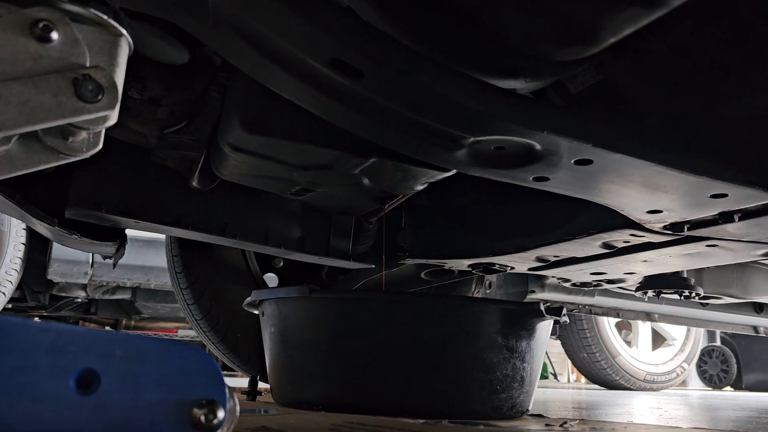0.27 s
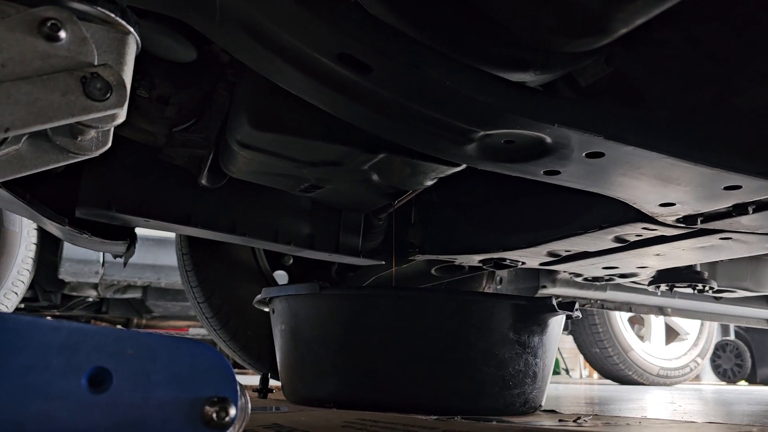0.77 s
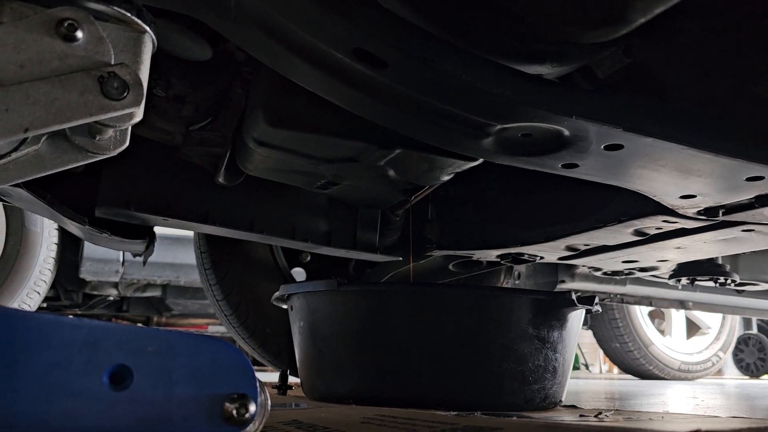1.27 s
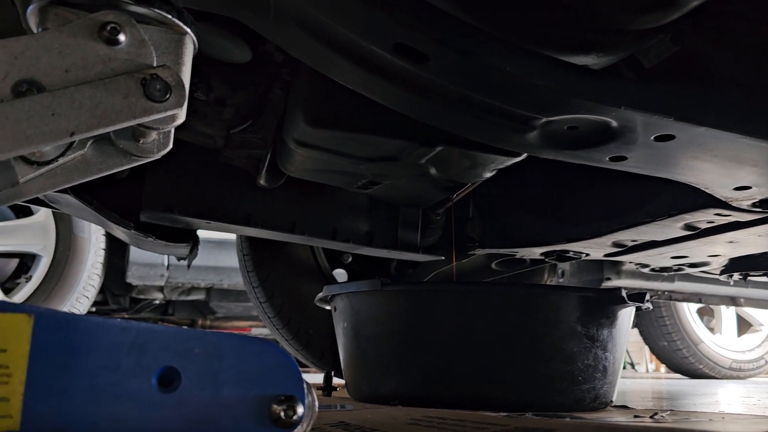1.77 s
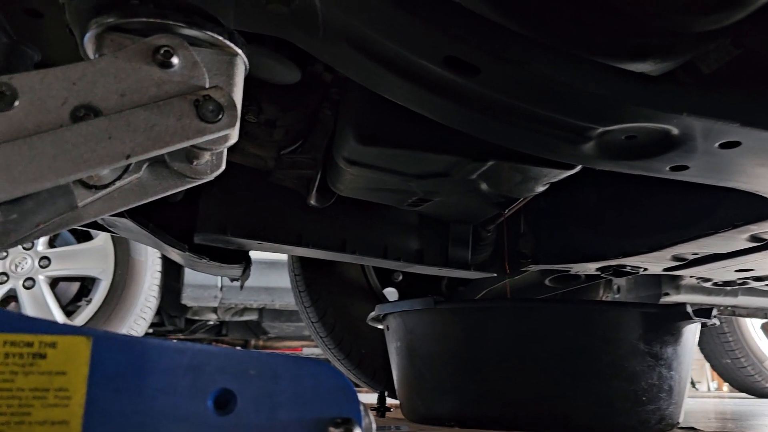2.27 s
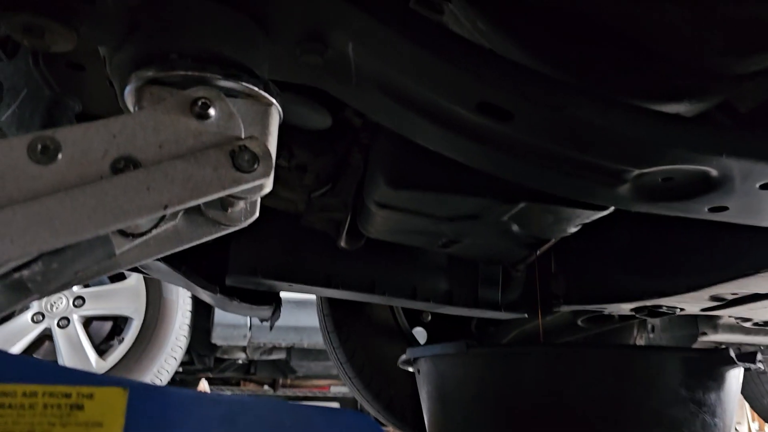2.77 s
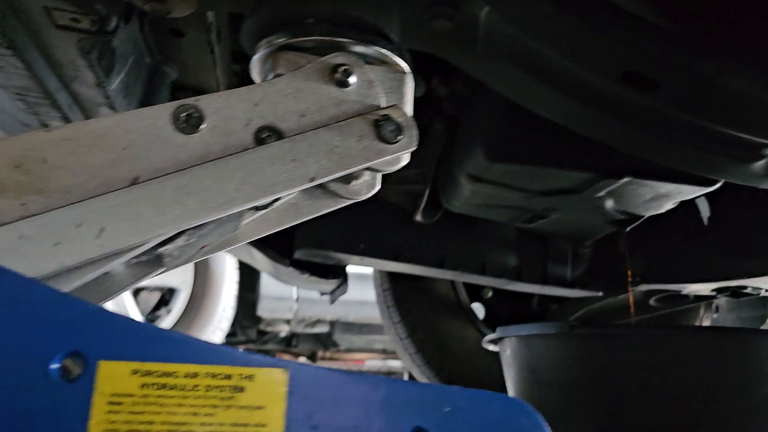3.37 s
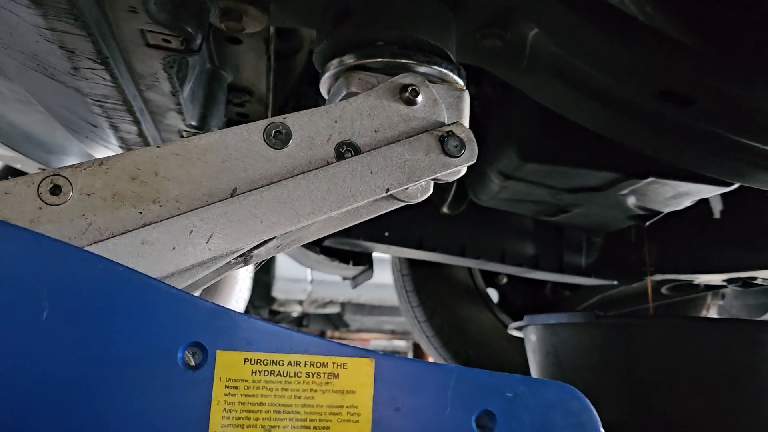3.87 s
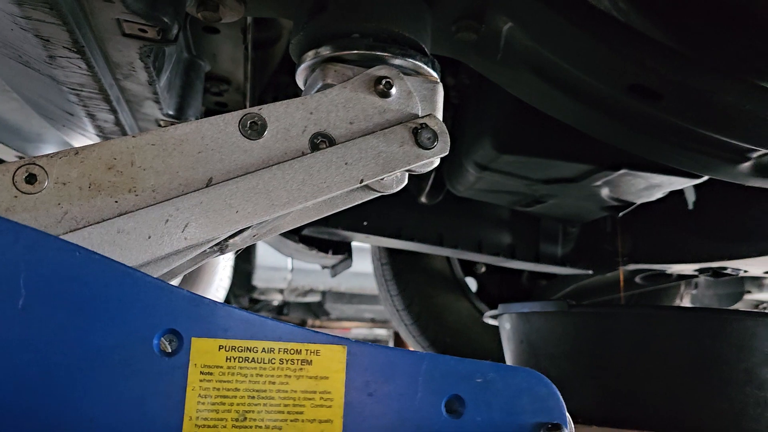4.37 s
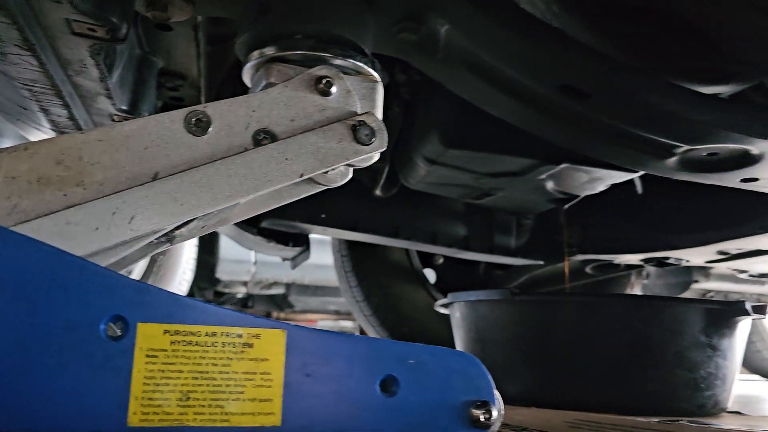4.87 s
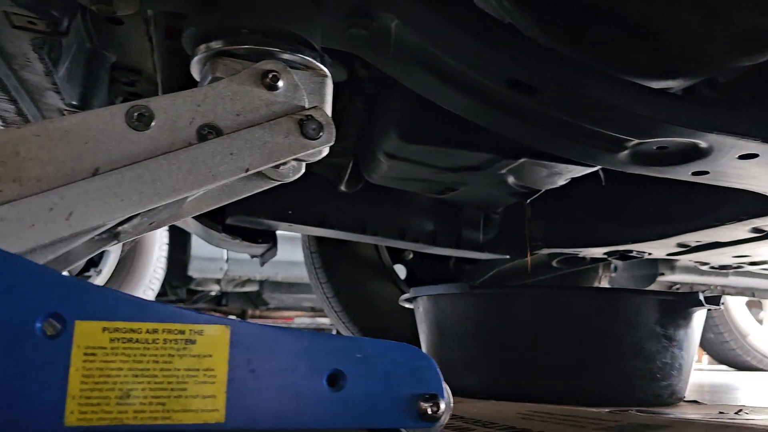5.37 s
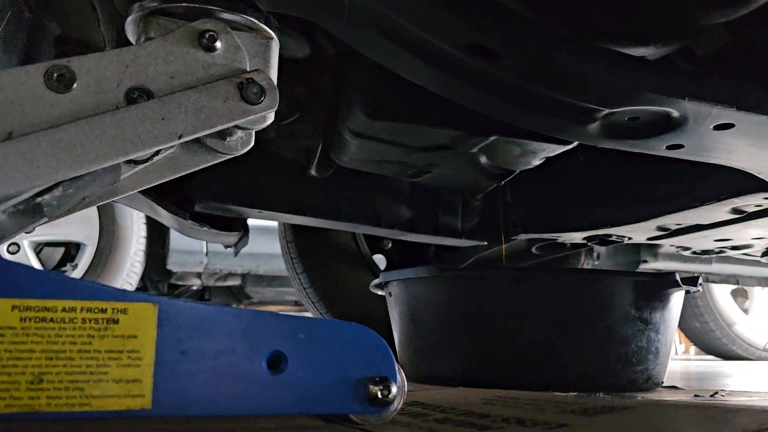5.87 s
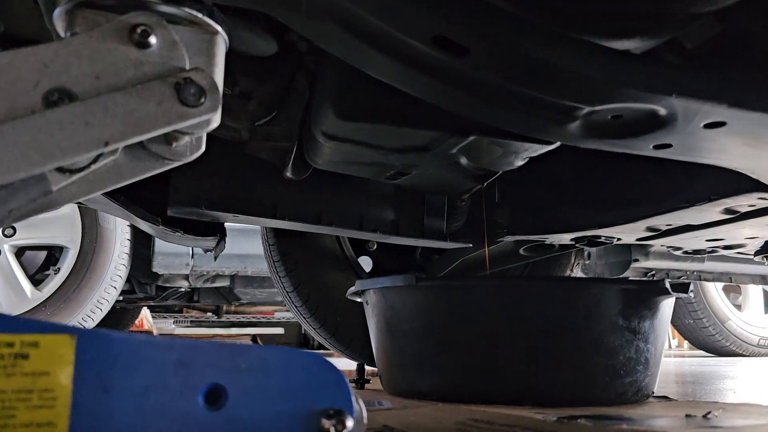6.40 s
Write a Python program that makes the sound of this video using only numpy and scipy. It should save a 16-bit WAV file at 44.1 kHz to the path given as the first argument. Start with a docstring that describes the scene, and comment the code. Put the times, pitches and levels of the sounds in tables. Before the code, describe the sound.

A thin stream of used oil falls into a plastic pan under a raised car, making a faint, high patter with small irregular drips throughout. A low garage rumble and soft air hiss lie beneath it. A distant motor drones briefly twice in the first half. Then clothing brushes softly and the grip creaks a little as the microphone is moved around low beside the car.

```python
"""Soft, wet ticks and patter: a thin stream of used oil falls into a plastic pan under a jacked-up car.
Splats and tiny bubbles excite the resonances of the hollow between pan and underbody.
Behind them lie the garage's low rumble, the hiss of moving air and a faint whine of mains harmonics.
A distant motor drones twice; clothing brushes and the grip creaks as the microphone is carried around."""
import sys
import numpy as np
from scipy import signal
from scipy.fft import rfft, irfft, next_fast_len
from scipy.io import wavfile
from scipy.ndimage import uniform_filter1d

SR = 44100
rng = np.random.default_rng(int(sys.argv[2]) if len(sys.argv) > 2 else 0)


def wrap_up_sound(samples):
    """Save the sound to the file named by the first command line argument, as 16-bit audio."""
    columns = np.atleast_2d(samples).T
    # keep every value between -1 and 1, then stretch to whole-number steps
    tamed = np.clip(columns, -1, 1)
    steps = np.round(tamed * 32767).astype(np.int16)
    wavfile.write(sys.argv[1], SR, steps)


N = 292705
T = np.arange(N) / SR
MAINS_HZ, TOP_HZ = 60.014, 15750

# Levels in the tables are relative; each source applies its own gain.
# spectrum of the garage rumble: f/Hz, level/dB
RUMBLE_SPECTRUM = [(20, -23), (38, -5), (56, 0.5), (80, 5.5), (110, -3), (138, -2.5), (175, -12),
                   (240, -13), (290, -19), (340, -33.5), (390, -24.5), (470, -46)]
# envelope of the deep rumble: t/s, level/dB
DEEP_ENVELOPE = [(0.1, -47), (.5, -50), (1.8, -49.5), (2.5, -51.5), (3.9, -52), (5.8, -52), (6.6, -48.5)]
# envelope of the upper rumble: t/s, level/dB
UPPER_ENVELOPE = [(0, -61.5), (2.2, -58.5), (4.1, -63.5), (4.7, -60), (5.7, -65), (6.6, -62)]
# spectrum of moving air: f/Hz, left level/dB, right level/dB
AIR_SPECTRUM = [(99, 4, 0), (251, -5.5, -3.5), (426, -2.5, -7.5), (601, -2, -7), (709, -10, -13.5),
                (1080, -12.5, -14), (1250, -6.5, -16), (1924, -5, -17), (2390, -17.5, -27),
                (3300, -17, -24.5), (6850, -23.5, -24.5), (9200, -54, -31.5)]
# envelope of moving air: t/s, level/dB
AIR_ENVELOPE = [(0.0, -70), (0.51, -71), (1.43, -70.5), (1.91, -71.5), (2.17, -67), (2.77, -71),
                (3.27, -68), (4.23, -72), (6.6, -71.5)]
# spectrum of the electric whine: f/Hz, left level/dB, right level/dB
WHINE_SPECTRUM = [(11050, -9, -9), (11650, -5, -6), (12100, -8, -8), (13200, -12, -9), (13800, -10, -3),
                  (14500, -9, 0), (15100, -10, -2), (15650, -11, -6)]
# envelope of the narrow background hum: t/s, level/dB
HUM_ENVELOPE = [(0, -76), (1, -54.5), (1.5, -66), (3.7, -64), (4.2, -62), (6.6, -54.5)]
# brief hums that rise out of the rumble: t/s, duration/s, f/Hz, level/dB
BRIEF_HUMS = [(1.748, 0.27, 170, -57), (2.17, 0.25, 587, -69), (1.4, 0.51, 670, -72.5),
              (2.864, 1, 243.6, -60)]
# pulls of the distant motor: t/s, duration/s, starting f/Hz, glide/(Hz/s), level/dB
MOTOR_PULLS = [(1.3, 0.655, 139, -2, -51), (2.05, .83, 133, 29, -48.3)]
# strokes of clothing: t/s, duration/s, level/dB, centre f/Hz, bandwidth/Hz, grain depth/dB
CLOTH_STROKES = [(2.9, 0.35, -66, 5300, 5960, 2.5), (3.023, 0.71, -65, 4780, 7500, 1.7),
                 (3.403, 0.16, -63.5, 450, 201, 0), (3.874, 0.091, -60, 1870, 200, 3),
                 (4.163, 0.07, -62.5, 2560, 1400, 2), (6.034, 0.27, -69.5, 4350, 4650, 0)]
# slips of the grip: t/s, peak level/dB
GRIP_SLIPS = [(1.469, -55), (4.335, -54), (4.36, -52), (4.404, -51), (4.424, -54), (4.449, -54.5)]
# modes of the hollow between pan and underbody: f/Hz, bandwidth/Hz, level/dB
HOLLOW_MODES = [(2978, 147, 4.5), (3546, 236, 1.5), (4230, 200, 0.5), (4590, 170, 0), (5330, 450, 3.5),
                (6400, 460, -2.5), (7370, 260, 1), (7480, 170, -7), (9370, 230, -1.5)]
# envelope of the stream, which swells, then thins as the sump empties: t/s, level/dB
STREAM_ENVELOPE = [(0, -75.5), (1.3, -75.5), (2.8, -72), (4.1, -71.5), (5.8, -73), (6.6, -78)]
# flurries in which the stream breaks into fine splatter: t/s, duration/s, level/dB
FLURRIES = [(0.136, 0.32, -71), (0.646, 0.1, -71), (0.847, 0.083, -65), (1.08, 0.2, -68),
            (1.467, 0.11, -64.5), (2.02, 0.28, -71.5), (5.01, 0.25, -72), (5.592, 0.22, -74)]
# drops that stand out of the trickle: t/s, level/dB, ring f/Hz, treble relative to that level/dB
DROPS = [(0.027, -67.5, 3160, -16), (0.143, -71, 4180, -13), (0.2055, -71.5, 5350, -3),
         (0.2705, -73.5, 3020, -5), (0.3703, -75.5, 3460, -4.5), (0.4086, -71.0, 3440, -13),
         (0.4695, -77.5, 5260, 3.5), (0.532, -75.5, 2980, -22), (0.709, -70.5, 4150, -9.5),
         (0.776, -76, 4190, -6), (0.9462, -75, 3620, -21), (1.0077, -69.5, 3010, -4.5),
         (1.054, -65.5, 3350, -1.5), (1.095, -72.5, 3500, -16), (1.198, -72.5, 4500, -7),
         (1.281, -66, 3130, -14), (1.4478, -66.0, 3350, -20), (1.49, -72, 5700, -9),
         (1.5445, -69.5, 3440, -12), (1.58, -71, 3400, -10.5), (1.6334, -72.5, 2990, -5),
         (1.7936, -69, 3070, -5.5), (1.927, -74, 3650, -16), (2.0254, -71, 3650, -11),
         (2.0985, -72.5, 3630, -27), (2.157, -66, 4490, -5.5), (2.186, -69.5, 3050, -1.5),
         (2.249, -78, 3550, -2), (2.305, -66.5, 4050, -14), (2.333, -75, 4560, -15),
         (2.363, -69.0, 2990, -5), (2.4247, -64.5, 3080, -17), (2.477, -69.5, 5340, -17),
         (2.561, -72, 3540, -28), (2.604, -68, 3100, -11), (2.701, -69.5, 5030, -11),
         (2.725, -70, 5280, -10), (2.7545, -69, 2900, -8), (2.797, -77, 3100, 4.5), (2.857, -66, 3080, -19),
         (2.915, -70.5, 4300, -10), (2.934, -67, 5340, 2), (2.9982, -73.5, 2960, 4.5),
         (3.0313, -73, 4660, 1), (3.2, -62.5, 5270, -21), (3.436, -72.5, 3630, -11),
         (3.6745, -72, 5650, -3.5), (3.7227, -79.5, 4540, 7), (3.8623, -69.5, 3230, -4.5),
         (4.0105, -68.5, 4300, -1), (4.16, -71.5, 5500, -7), (4.365, -71, 3250, -6), (4.455, -67, 3540, -7),
         (4.505, -68, 5470, -4), (4.63, -77.5, 4800, -3), (4.714, -75, 2980, -9), (4.7525, -82, 3370, 8),
         (4.771, -74.5, 3110, -5), (4.858, -72, 3700, -7), (4.9016, -75.5, 4270, -5),
         (4.9504, -73.5, 3640, -22), (5.0682, -72, 3100, -4), (5.171, -71, 3070, -9),
         (5.279, -69.5, 3040, -11), (5.386, -79.5, 3640, 5.5), (5.7452, -70.5, 3020, -5.5),
         (6.016, -69, 5510, -11), (6.034, -69, 3530, -4.5), (6.1843, -68.5, 5130, -1.5),
         (6.475, -65.5, 4550, -7.5), (6.5668, -71, 4430, -1.5)]


def undb(db):
    """Amplitude ratio of a level in decibels."""
    return 10 ** (np.asarray(db) / 20)


def unit(x):
    """Normalisation to rms 1."""
    return x / np.sqrt(np.mean(x ** 2))


def curve(table):
    """Linear interpolation of (t/s, level/dB) points through time."""
    return np.interp(T, *np.transpose(table))


def swell(s, length_s):
    """Half-sine envelope that starts at time s."""
    return np.sin(np.pi * np.clip((T - s) / length_s, 0, 1))


def walk(rate_hz):
    """Random modulation: held values, smoothed twice, at rms 1."""
    hold = int(SR / rate_hz)
    steps = np.repeat(rng.standard_normal(N // hold + 1), hold)
    return unit(uniform_filter1d(uniform_filter1d(steps, hold), hold)[:N])


def contour(points, hz):
    """Spectral envelope: gain between (f/Hz, level/dB) points on a logarithmic frequency axis."""
    f, db = np.transpose(points)
    return undb(np.interp(np.log(hz + 1e-3), np.log(f), db))


def ears(table, f):
    """Binaural spectral envelope: one gain contour for each ear."""
    return np.array([contour(np.array(table)[:, [0, ear]], f) for ear in (1, 2)])


def place(pan_db):
    """Interaural level difference: two gains, the left pan_db above the right."""
    return undb(np.array([[pan_db], [-pan_db]]) / 2)


def resonance(f, hz, width):
    """Complex response of a damped oscillator, gain 1 at its centre."""
    return 1j * f * width / (hz ** 2 - f ** 2 + 1j * f * width)


def causal(gain):
    """Minimum phase: the response with this gain that rings only after it is struck."""
    cepstrum = irfft(np.log(gain + 1e-4))
    folded = np.r_[cepstrum[0], 2 * cepstrum[1:len(cepstrum) // 2]]
    return np.exp(rfft(folded, len(cepstrum)))


def shape(x, response):
    """Linear filtering: the spectrum of x is multiplied by response(f)."""
    n = next_fast_len(x.shape[-1])
    f = np.arange(n // 2 + 1) * SR / n
    return irfft(rfft(x, n) * response(f), n)[..., :x.shape[-1]]


def rumble(split_hz=140, upper_gain_db=3, apart=0.068):
    """Long waves reach both ears nearly alike; two bands of room noise swell separately."""
    noise = rng.standard_normal(N) + apart * rng.standard_normal((2, N))
    noise = shape(noise, lambda f: contour(RUMBLE_SPECTRUM, f) * (f < RUMBLE_SPECTRUM[-1][0]))
    deep = shape(noise, lambda f: 1 / (1 + (f / split_hz) ** 10))
    upper = unit(noise - deep) * undb(curve(UPPER_ENVELOPE) + upper_gain_db)
    return unit(deep) * undb(curve(DEEP_ENVELOPE)) + upper


def air(split_hz=900, rush_db=9, hiss_db=3.5, flicker_db=1.0):
    """Broadband flow noise: a low rush and a smooth hiss share one envelope, stronger on the left."""
    noise = shape(rng.standard_normal((2, N)), lambda f: ears(AIR_SPECTRUM, f))
    rush = shape(noise, lambda f: 1 / (1 + (f / split_hz) ** 10))
    draught = unit(rush) * undb(rush_db) + unit(noise - rush) * undb(hiss_db)
    return draught * undb(curve(AIR_ENVELOPE) + flicker_db * walk(19))


def whine(level_db=-74.3, waver_db=0.3, haze_db=-6, paths=4, size=2 ** 13):
    """Multipath interference: high mains harmonics waver as their paths shift, in a haze of noise."""
    colour = lambda f: ears(WHINE_SPECTRUM, f) * (f > WHINE_SPECTRUM[0][0]) * (f < TOP_HZ)
    harmonic_hz = np.arange(size // 2 + 1) * MAINS_HZ
    position = T * MAINS_HZ % 1 * size  # within one mains period of `size` points
    lines = 0
    for _ in range(paths):
        phases = np.exp(2j * np.pi * rng.random((2, len(harmonic_hz))))
        cycles = irfft(colour(harmonic_hz) * phases)
        arrival = np.array([np.interp(position, np.arange(size), cycle) for cycle in cycles])
        lines = lines + walk(0.76) * arrival
    lines /= np.sqrt(uniform_filter1d(np.mean(lines ** 2, axis=0), SR // 10))  # the total stays even
    haze = unit(shape(rng.standard_normal((2, N)), colour))
    return unit(lines + undb(haze_db) * haze) * undb(level_db + waver_db * walk(12))


def hums(hz=136, width_hz=10):
    """Narrow-band noise is heard as a hum; brief pure tones swell and fade beside it."""
    band = unit(shape(rng.standard_normal(N), lambda f: resonance(f, hz, width_hz) ** 2))
    tones = sum(undb(db) * swell(s, length_s) * np.sin(2 * np.pi * tone_hz * T)
                for s, length_s, tone_hz, db in BRIEF_HUMS)
    return undb(curve(HUM_ENVELOPE)) * band + np.sqrt(2) * tones


def motor(attack_s=0.05, release_s=0.14, waver_db=1.2):
    """Linear frequency glide: a distant motor pulls twice, climbing in pitch the second time."""
    drone = 0
    for s, length_s, hz, glide, db in MOTOR_PULLS:
        t = T - s
        envelope = np.clip(np.minimum(t / attack_s, (length_s - t) / release_s), 0, 1)
        drone = drone + undb(db) * envelope * np.sin(2 * np.pi * (hz + glide * t / 2) * t)
    return np.sqrt(2) * drone * undb(waver_db * walk(12))


def brushes(pan_db=-0.5):
    """Sliding friction: cloth gives soft swells of grainy noise as it catches and slips."""
    out = 0
    for s, length_s, db, hz, width, grain_db in CLOTH_STROKES:
        stroke = swell(s, length_s)
        rub = shape(rng.standard_normal((2, N)), lambda f: resonance(f, hz, width) ** 2)
        rub *= undb(grain_db * walk(140))
        out = out + unit(rub * stroke) * np.sqrt(np.mean(stroke ** 2)) * undb(db)
    return out * place(pan_db)


def creaks(body_hz=450, width_hz=290, gain_db=3, pan_db=10):
    """Stick-slip: each slip of the fingers excites a dull, quickly damped knock in the housing."""
    slips = np.zeros(N)
    for s, db in GRIP_SLIPS:
        slips[int(s * SR)] = undb(db)
    knocks = shape(slips, lambda f: resonance(f, body_hz, width_hz) ** 3)
    return knocks * slips.max() / np.abs(knocks).max() * undb(gain_db) * place(pan_db)


def hollow(f, bed_db=-13, low_hz=2700, edge_hz=9300):
    """Cavity resonance: modes over the oil add in power to a treble bed; the pan wall shades the top."""
    modes = sum(np.abs(undb(db) * resonance(f, hz, width)) ** 2 for hz, width, db in HOLLOW_MODES)
    bed = undb(bed_db) ** 2 * np.abs(resonance(f, 5400, 4200)) ** 6
    edge_loss = (1 + (f / edge_hz) ** 16) * (1 + (low_hz / (f + 1)) ** 20)
    return causal(np.sqrt(modes + bed) / edge_loss)


def scatter(t, direct=4, build_s=.0006, early_s=.006, tail_s=.06, tail_db=-19, apart=.85):
    """Impulse response at each ear: direct sound, quick reflections under the car, a faint garage tail."""
    flutter = rng.standard_normal(len(t)) + apart * rng.standard_normal((2, len(t)))
    decay = np.exp(-t / early_s) + undb(tail_db) * np.exp(-t / tail_s)
    echoes = flutter * (1 - np.exp(-t / build_s)) * decay
    echoes[:, 0] += direct
    echoes[0] = np.roll(echoes[0], 21)  # the left ear is half a millisecond further from the pan
    return echoes


def bubble(t, hz, ring_s=0.0018, rise=3):
    """Damped oscillation: a tiny cavity in the oil rings, rising slightly in pitch."""
    return np.sin(2 * np.pi * hz * t * (1 + rise * t)) * np.exp(-t / ring_s)


def splat(t, swell_s):
    """Viscous impact: a drop spreads and tears in a rough push a few milliseconds long."""
    return unit(rng.standard_normal(len(t)) * t * np.exp(-t / swell_s))


def spray(t, count=7, within_s=.024, tick_s=.0012):
    """Secondary impacts: fine droplets thrown up by a drop fall back just after it."""
    ticks = sum(size * (t > within_s * late) * np.exp(-np.abs(t - within_s * late) / tick_s)
                for late, size in rng.random((count, 2)))
    return unit(shape(ticks * rng.standard_normal(len(t)), lambda f: resonance(f, 3800, 4000)))


def bursts(count, low_hz=3050, high_hz=5500):
    """Random point process: times and pitches of bubbles that burst at uneven intervals."""
    late, pitch = rng.random((count, 2)).T
    times = (np.arange(count) + 2 * late) / (count + 1) * N / SR
    return times, low_hz * (high_hz / low_hz) ** (pitch ** 2.2)  # most ring near the low end


def patter(count=800, range_db=9, ring_s=.002, splat_s=.0016, sputter_db=3, pan_db=-2):
    """Superposition: bubbles and splats merge where the stream lands and keep the hollow ringing."""
    t = np.arange(SR // 40) / SR
    pops = np.zeros(N + len(t))
    for s, hz, size in zip(*bursts(count), rng.random(count)):
        start = int(s * SR)
        pop = unit(bubble(t, hz, ring_s)) + splat(t, splat_s)
        pops[start:start + len(t)] += undb(range_db * size) * pop
    echoes = scatter(np.arange(SR // 5) / SR)
    wet = signal.fftconvolve(pops[None, :N], echoes, axes=1)[:, :N]
    stream = undb(curve(STREAM_ENVELOPE) + sputter_db * walk(21.96))
    flurries = sum(undb(db) * swell(s, length_s) for s, length_s, db in FLURRIES)
    return unit(shape(wet, hollow)) * np.hypot(stream, flurries) * place(pan_db)


def drips(gain_db=1.5, ring_db=1, spray_db=-6.5, typical_db=-68, swell_s=0.00078, pan_db=-2.5):
    """Impact excitation: each drop rings several modes of the hollow at once and traps a bubble."""
    t = np.arange(SR // 10) / SR
    body = lambda f: 1 / (1 + (f / 6000) ** 14)  # the band below the treble snap
    out = np.zeros((2, N + len(t)))
    for s, db, hz, treble_db in DROPS:
        echoes = scatter(t)

        def heard(x, colour):
            """Convolution carries x to both ears, filtered and at rms 1."""
            return unit(shape(signal.fftconvolve(x[None], echoes, axes=1), colour)[:, :len(t)])

        softness = undb(0.5 * (typical_db - db))  # weak drops land more softly, with more spray
        splash = splat(t, swell_s * softness) + undb(spray_db) * softness * spray(t)
        ring = heard(bubble(t, hz), lambda f: resonance(f, hz, hz / 4))
        wet = heard(splash, lambda f: hollow(f) ** 2 * body(f) * resonance(f, hz, hz))
        snap = heard(splash, lambda f: hollow(f) * (1 - body(f)))
        drop = unit(wet + undb(ring_db) * ring) + undb(treble_db) * snap
        start = int(s * SR)
        out[:, start:start + len(t)] += undb(db + gain_db) * drop
    return out[:, :N] * place(pan_db)


def scene():
    """Sound pressures add: the garage, the oil in the pan and the handling."""
    lows = (rumble() + hums() + motor()) * place(pan_db=1.3)
    return lows + drips() + patter() + air() + whine() + brushes() + creaks()


def record(dry):
    """Frequency response: the microphone dips in the high treble and the recorder cuts the top."""
    dip_hz, width_hz, depth = 10300, 1200, .55
    coloured = shape(dry, lambda f: 1 - depth * resonance(f, dip_hz, width_hz))
    return signal.sosfilt(signal.ellip(10, .2, 70, TOP_HZ, fs=SR, output="sos"), coloured)


dry = scene()
out = record(dry)
wrap_up_sound(out)
```